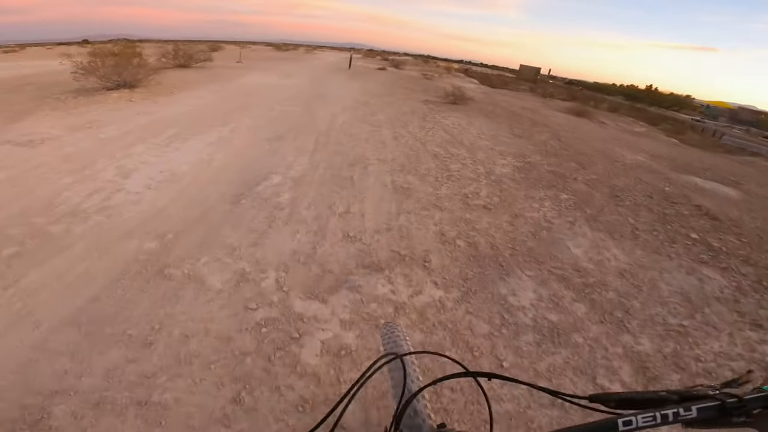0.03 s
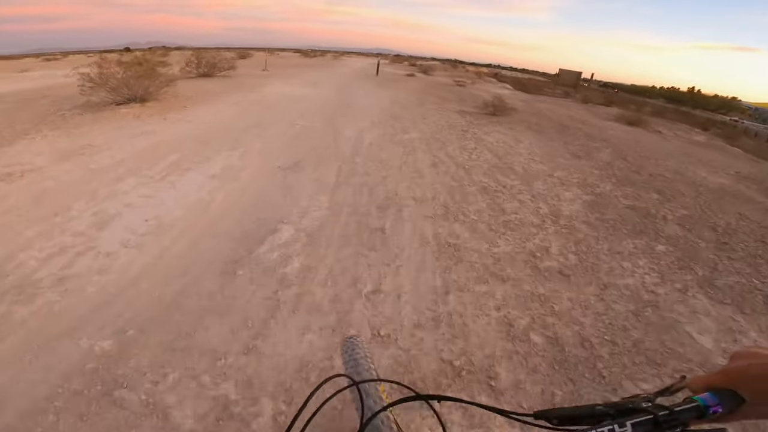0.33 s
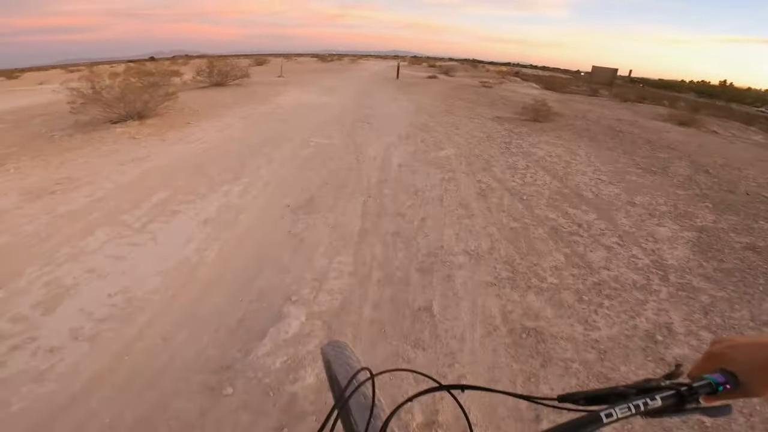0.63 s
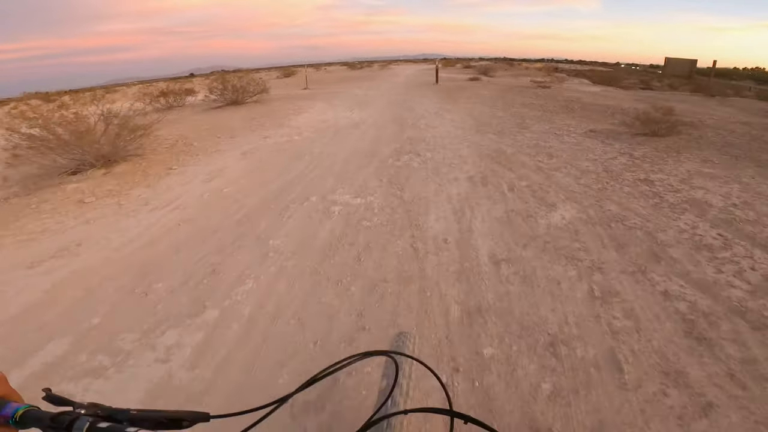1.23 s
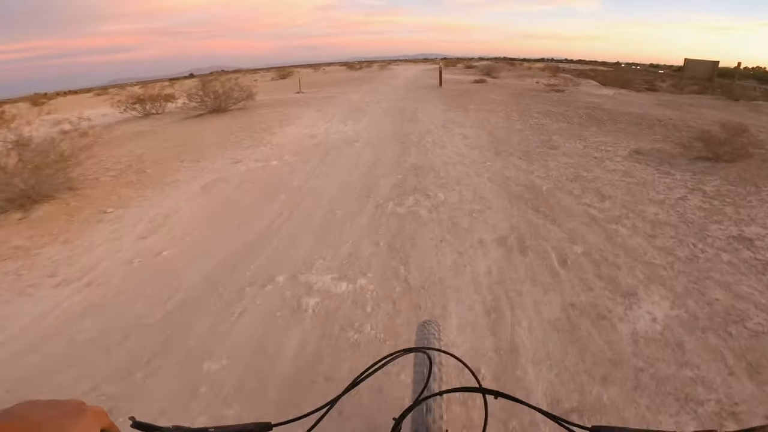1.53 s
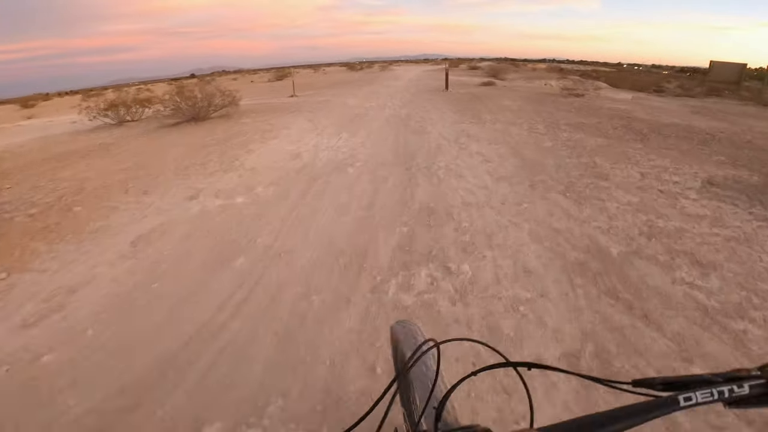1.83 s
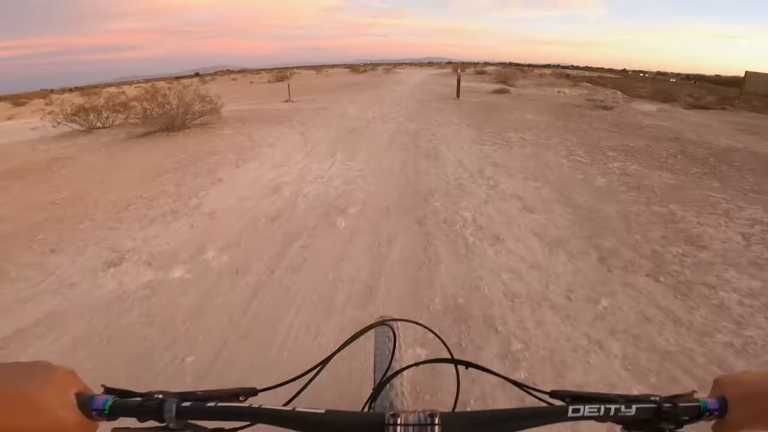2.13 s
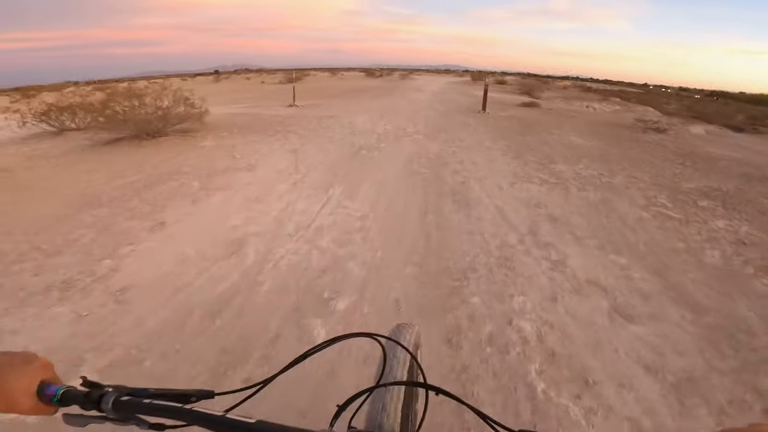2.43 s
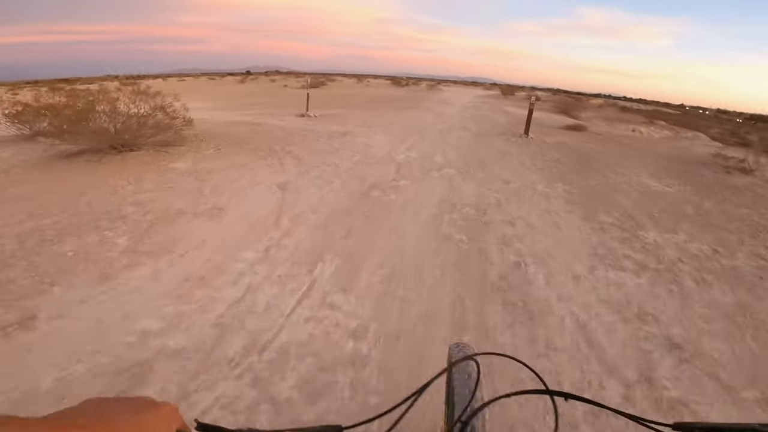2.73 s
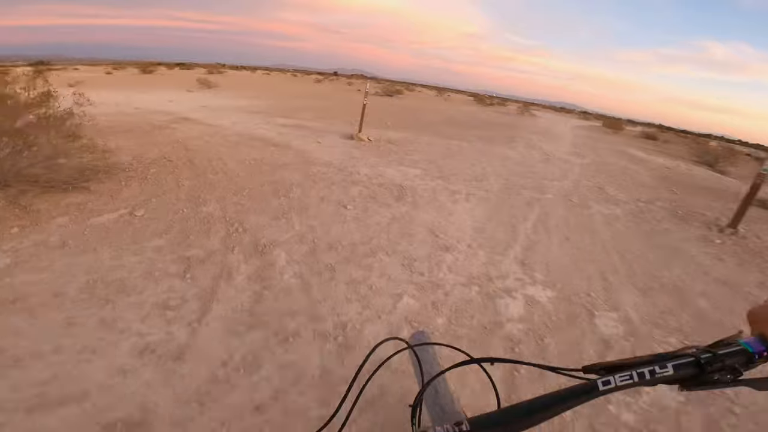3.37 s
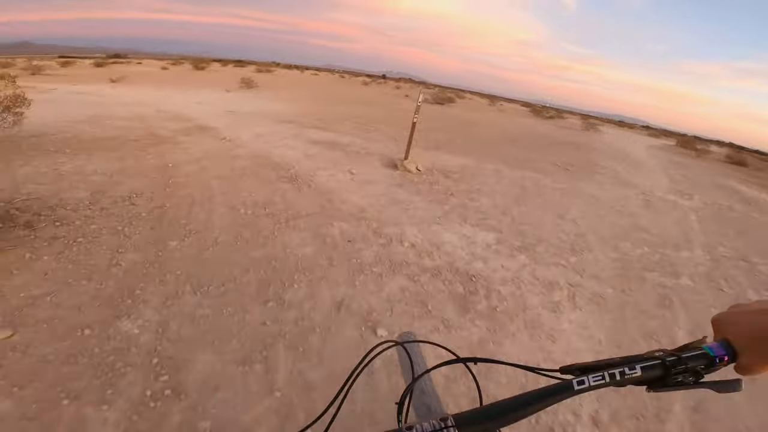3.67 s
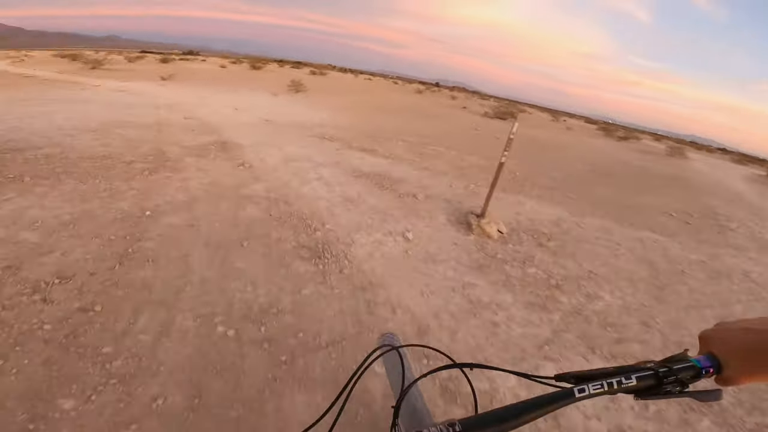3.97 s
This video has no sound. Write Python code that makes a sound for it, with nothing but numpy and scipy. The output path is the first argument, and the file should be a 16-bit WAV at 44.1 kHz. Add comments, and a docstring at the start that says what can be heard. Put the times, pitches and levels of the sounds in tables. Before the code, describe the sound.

Bicycle chain and parts clack over bumps, with crunching tyres and rumbling wind.

```python
"""A mountain bike rolls fast down a bumpy dirt trail, heard from a camera on the rider's chest.
From the start, wind buffets the microphone and the tyres crunch grit. Soon stones knock, loose metal
ticks, the wheels thump and the chain slaps the frame. Just after 1 s the front end clacks twice, then
a last big bump leaves a wheel humming. Stones keep knocking and the wind grows louder. From 3.5 s the
rider coasts and the freehub (the ratchet in the back wheel) buzzes."""
import sys
import numpy as np
from scipy import signal
from scipy.fft import rfft, irfft
from scipy.io import wavfile
from scipy.ndimage import uniform_filter1d

SR = 44100
rng = np.random.default_rng(int(sys.argv[2]) if len(sys.argv) > 2 else 0)


def unload_audio(sound):
    """Save the sound as a 16-bit wav file, at the path given as the first command line argument."""
    columns = np.transpose(np.atleast_2d(sound))
    # keep every value between -1 and 1, then stretch to whole-number steps
    steps = np.round(np.clip(columns, -1, 1) * 32767)
    wavfile.write(sys.argv[1], SR, steps.astype(np.int16))


N = 176400
T = np.arange(N) / SR
HIT_T = T[:16384]  # the clock of one short hit [s]

# A colour says how strong noise is at each frequency. A mode is one tone of a ringing part.
# A fade time (t60) is how long a sound takes to drop by 60 dB.
# how alike left and right are, for most sounds and for ticks: (frequency [Hz], likeness [-1 to 1])
LIKENESS = [(100, 1), (600, 0.95), (1400, 0.98), (3100, 0.78), (7000, 0.35), (15000, 0.12)]
TICK_LIKENESS = [(500, 0.82), (1650, 0.85), (5000, 0.22), (9000, -0.25), (15000, -0.39)]
# how far left runs ahead of right: (frequency [Hz], phase [radians])
LEFT_LEAD = [(100, 0.3), (600, -0.15), (1800, -1.09), (3700, -0.25), (5600, 0.057), (8000, 1), (15000, .2)]

# the wind's low rumble and higher roar: (time [s], relative level [dB])
RUMBLE_LEVELS = [(0.03, -32.5), (0.17, -31), (0.9, -35.5), (1.16, -29), (1.27, -33.5), (1.51, -25),
                 (1.57, -31.5), (1.96, -25), (1.99, -33), (2.1, -28), (2.14, -39), (2.19, -28),
                 (2.58, -30.5), (2.7, -22.5), (2.84, -28), (2.95, -37.5), (3.1, -37), (3.27, -27.5),
                 (3.66, -25), (3.96, -25)]
ROAR_LEVELS = [(0.0, -42), (0.6, -40), (0.87, -43.5), (1.22, -41), (2.27, -40.5), (2.5, -36.5), (2.76, -34),
               (2.95, -41.5), (3.1, -37.5), (3.21, -35), (3.41, -30), (3.51, -25.5), (3.68, -27.5),
               (3.8, -29), (4.0, -27)]
# crunching grit and droning tyre walls: (time [s], level [dB])
GRIT_LEVELS = [(0, -44), (.15, -41), (.29, -46), (.45, -40.5), (.53, -46), (.85, -40.5), (1.1, -44.5),
               (1.3, -40.5), (1.6, -44), (1.8, -44), (2.04, -40.5), (2.13, -45.5), (2.23, -45),
               (2.33, -39.5), (2.5, -36.5), (2.65, -40.5), (2.8, -43.5), (2.96, -38.5), (3.04, -37.5),
               (3.12, -41), (3.27, -40.5), (3.35, -35.5), (3.47, -40), (4, -39)]
DRONE_LEVELS = [(0, -36.5), (.2, -40), (.5, -43.5), (.9, -39), (1.15, -47), (1.55, -43), (1.85, -45.5),
                (2.2, -47.5), (3, -53), (4, -44.5)]
# colours of the wind, the tyres and a stone's knock: (frequency [Hz], relative level [dB])
RUMBLE_COLOUR = [(3, -6), (14, -8), (25, -1.5), (40, 1), (65, -1.5), (100, -6), (150, -12.5), (250, -28.5),
                 (600, -50), (2000, -97)]
ROAR_COLOUR = [(50, -12.5), (120, 1), (180, 1), (250, 1), (330, -7), (500, -16.5), (900, -30.5),
               (3000, -42), (9000, -83)]
GRIT_COLOUR = [(100, -6), (250, -3.5), (450, -3), (700, -2.5), (1200, 1.5), (1800, 0), (2800, -3),
               (4000, -11.5), (5500, -17.5), (7200, -24.5), (9000, -31.5), (12000, -39), (15500, -71)]
DRONE_COLOUR = [(120, -18.5), (250, -12), (420, 5), (620, -1), (1000, 2), (1500, -5), (2500, -34),
                (8000, -43)]
KNOCK_COLOUR = [(150, -21), (400, 0.5), (780, -4), (900, -1), (1070, 9.5), (1250, -6), (1500, 2),
                (2400, -5.5), (3400, -20), (6000, -30), (14000, -57)]
# stones under the tyres: (time [s], level [dB], pitch [multiple])
KNOCKS = [(.246, -29, 1.13), (0.3917, -23.5, 1.02), (.399, -27.5, 1.23), (.4055, -20.5, 0.8),
          (.411, -31, 0.82), (0.4204, -24.5, 0.86), (1.1642, -35, 1.55), (1.184, -29.5, 1.4),
          (1.639, -35, 1.1), (1.894, -39, 1.6), (1.921, -33.5, 1.1), (1.9983, -32.5, 0.95),
          (2.01, -30, 1.13), (2.0762, -30.5, 1.31), (2.291, -34, 1.63), (2.319, -33, 1.54),
          (2.33, -33.5, 1.46), (2.4765, -30.5, 1.35), (2.489, -32, 1.44), (2.575, -36, 1.24),
          (3.0466, -36, 1.7), (3.1344, -35, 1), (3.268, -35.5, 0.9), (3.313, -44, 0.93), (3.405, -35, 1.2),
          (3.428, -33.5, 1.45), (3.567, -29.5, 1.22), (3.587, -31, 1.28), (3.679, -29.5, 1.17)]

# the freehub's strongest ringing: (time [s], level [dB])
HUB_RING_LEVELS = [(3.5, -77), (3.54, -40), (3.6, -43), (3.68, -54), (3.75, -66), (3.82, -35.5),
                   (3.88, -64), (3.94, -41.5), (4, -51)]
# colours of its buzz and of that ringing: (frequency [Hz], relative level [dB])
HUB_BUZZ_COLOUR = [(600, -33), (1000, 2), (1250, 2.5), (1550, -8), (2100, 6.5), (2250, 6), (2420, 4),
                   (2700, 0.5), (3100, -11), (3380, -5), (3900, -8), (5100, -11), (5480, -8), (5900, -8),
                   (6500, -8.5), (7000, -6), (8000, -10.5), (9000, -14), (9850, -13.5), (11000, -17.5),
                   (12200, -19), (15500, -34)]
HUB_RING_COLOUR = [(1500, -38), (2200, -19), (2420, 3), (2550, -10), (2700, -3), (2950, -24), (3380, -10),
                   (3750, -22), (5200, -24), (5480, -16), (5800, -31), (6500, -20), (7200, -40)]
# tones of the parts that ring: (frequency [Hz], relative level [dB], fade time [s])
HUB_MODES = [(1250, -1, 0.027), (2440, 4, .028), (2600, 0, .03), (3360, 1.5, .04), (4200, -9, .06),
             (4880, -7, 0.055), (5400, -2.5, 0.04), (6540, -6, .03), (8500, -17, .04), (9800, -11, .04)]
WHEEL_MODES = [(597, -4, 0.41), (630, -1, 0.55), (695, 0, 0.54), (770, -1, 0.39)]
FRONT_END_MODES = [(792, 9, 0.11), (1312, -9.5, .11), (1730, 7, 0.033), (1740, 2, .035),
                   (2050, -4.5, 0.076), (2130, -13, 0.12), (2640, -1.5, 0.04), (3346, -6.5, 0.1),
                   (4400, -4, 0.05), (5000, -5, 0.074), (5120, -8, .08), (7200, -11, .06)]
FRAME_MODES = [(225, -4.5, 0.1), (257, -13, 0.064), (368, -5, 0.037), (419, -2.5, .06), (561, -5.5, 0.12),
               (605, -15, 0.26), (647, -15.5, 0.67), (740, -9, 0.16), (930, -16, 0.081)]
LINK_MODES = [(2110, 7, 0.14), (3310, 2.5, 0.12), (3960, -3, .11), (5000, -2, 0.085), (5400, -12, 0.11),
              (7340, -8, .1), (11100, -20, 0.12)]

# wheel thumps: (time [s], level [dB], pitch [Hz])
THUMPS = [(.317, -21.5, 243), (0.577, -22, 238), (.704, -36, 384), (.727, -14.5, 229.4), (0.7884, -19, 296),
          (.943, -18.5, 384), (.974, -18.5, 392), (.983, -14, 196), (1.4841, -14, 106)]
# loose metal ticks: (time [s], level [dB], brightness [dB per octave])
TICKS = [(0.2532, -18.5, 3), (0.3492, -23.5, 0.5), (0.427, -22.5, -1.5), (0.459, -35, -3.5),
         (0.4838, -25, 0.5), (0.6234, -27.5, -4), (1.245, -47, 4), (1.605, -42, 1), (2.772, -50, 2),
         (3.149, -42, -0.5), (3.489, -44, 1.5)]
# front end clacks: (time [s], ring level [dB], crack level [dB], contact pitch [Hz], hold [s])
CLACKS = [(1.1945, -18, -24.5, 1660, .004), (1.368, -19.5, -20.5, 2230, 0.0071)]
# clanks of single chain links: (time [s], level [dB], pitch [Hz])
CLANKS = [(.712, -39.5, 6100), (.7855, -41.5, 6000), (.941, -30, 5100), (.943, -30.5, 2070),
          (.973, -37, 4270), (1.026, -43, 5270), (1.442, -30.5, 3270), (1.446, -36.5, 5300)]
# colour of a clank: (frequency [multiple of its pitch], relative level [dB])
CLANK_COLOUR = [(.25, -35), (.8, -26), (.96, -4.5), (1, -3.5), (1.04, -10), (1.2, -21), (3, -40)]
# chain slaps: (time [s], hold [s], thud level [dB], clatter level [dB], jingle level [dB])
SLAPS = [(0.314, 0.0029, -31.5, -39, -45.5), (0.5708, 0.011, -34.5, -41.5, -55),
         (0.701, .012, -25.5, -29, -38), (0.723, 0.024, -30.5, -32.5, -46.5),
         (0.7844, 0.0037, -24.5, -27, -41.5), (.81, 0.0072, -48, -50, -57),
         (0.8546, 0.016, -29, -29.5, -48), (0.939, 0.0043, -27.5, -33, -34.5),
         (0.97, 0.017, -33.5, -31, -46), (1.025, 0.0057, -37, -37, -39.5),
         (1.439, 0.014, -27.5, -32.5, -42.5), (1.467, .008, -30, -27.5, -41.5),
         (1.485, 0.016, -36.5, -47, -54), (1.563, 0.023, -35, -45, -57)]
# colours of a tick, a clack's crack and a slap's three parts: (frequency [Hz], relative level [dB])
TICK_COLOUR = [(300, -13), (800, 5), (1050, 7), (1250, -7.5), (1650, 13), (2350, -4.5), (2900, 1.5),
               (3450, 5.5), (4300, -3), (5100, -2.5), (5900, 2.5), (6400, -0.5), (7300, -1), (9000, -13.5),
               (11800, -13), (15500, -30)]
CRACK_COLOUR = [(300, -4), (800, -13), (1000, -9), (1250, 3.5), (1650, 1.5), (2200, -2), (2800, -4.5),
                (3800, -10), (5300, -7), (6200, -19.5), (7200, -22), (9000, -27.5), (15000, -47)]
THUD_COLOUR = [(60, -25), (160, -13.5), (235, 3.5), (310, -3), (390, -3), (490, -10), (640, -7), (900, -19),
               (2000, -68)]
CLATTER_COLOUR = [(300, -8.5), (750, 1.5), (1100, 0), (1600, 3.5), (2200, 0), (2900, -3), (3900, -16.5),
                  (7000, -35), (15000, -56)]
JINGLE_COLOUR = [(1500, -32), (3200, 0), (4000, -1), (5000, 2.5), (6200, -6), (7200, -3), (8800, -11),
                 (11500, -13.5), (15500, -38)]


def amp(db):
    """Turns decibels into a number to multiply by."""
    return 10 ** (np.asarray(db) / 20)


def normalise(x):
    """Scales a signal to an average power of 1."""
    return x / np.sqrt(np.mean(x ** 2) + 1e-20)


def look_up(table, hz):
    """Reads a table between its rows, giving each octave equal room."""
    row_hz, value = np.transpose(table)
    return np.interp(np.log(hz + 1), np.log(row_hz), value)


def level(table):
    """Gain over time from rows of (time [s], level [dB])."""
    return amp(np.interp(T, *np.transpose(table)))


def pan(left_db):
    """Makes left louder than right; a negative value favours the right."""
    return amp([[left_db / 2], [-left_db / 2]])


def add(mix, start_s, sound):
    """Adds a sound to the mix at a given time."""
    part = mix[:, round(start_s * SR):][:, :sound.shape[1]]
    part += sound[:, :part.shape[1]]


def noise(n=N):
    """Two unrelated channels of plain hiss."""
    return rng.standard_normal((2, n))


def wander(hz):
    """A slow random wobble, up to about hz."""
    freqs = np.fft.rfftfreq(N, 1 / SR)
    return normalise(irfft(rfft(rng.standard_normal(N)) / (1 + (freqs / hz) ** 2), N))


def coloured(pair, colour, likeness=None):
    """Gives two unrelated noises a colour and blends them into left and right."""
    n = pair.shape[1]
    hz = np.fft.rfftfreq(n, 1 / SR)
    cepstrum = irfft(np.log(amp(look_up(colour, hz))), n)
    # keeping the first half makes the filter ring after a sound, never before
    response = np.exp(rfft(2 * cepstrum * (np.arange(n) < n // 2)))
    shared, separate = rfft(pair) * response
    if likeness is None:
        likeness = look_up(LIKENESS, hz)
    left = shared * np.exp(1j * look_up(LEFT_LEAD, hz))
    right = likeness * shared + np.sqrt(1 - likeness ** 2) * separate
    return normalise(irfft(np.array([left, right]), n))


def hit(colour, hold_s, t60, tail_db=-60, tail_t60=0.1, rise_s=0.00028, likeness=None):
    """A burst of noise: it rises fast, holds while parts chatter, then fades with a weak tail."""
    fading_s = np.maximum(HIT_T - hold_s, 0)
    fade = np.hypot(amp(-60 * fading_s / t60), amp(tail_db - 60 * fading_s / tail_t60))
    return np.minimum(HIT_T / rise_s, 1) * fade * coloured(noise(len(HIT_T)), colour, likeness)


def ring(modes):
    """A struck part rings with several tones, each fading at its own speed."""
    tones = np.zeros((2, len(HIT_T)))
    for hz, db, t60 in modes:
        phase = 2 * np.pi * (hz * HIT_T + rng.random())
        tones += amp(db - 60 * HIT_T / t60) * np.sin([phase + look_up(LEFT_LEAD, hz), phase])
    return np.minimum(HIT_T / 0.00037, 1) * tones


def crackle(per_s, spread_db, decay_s, share):
    """A gain that jumps at each tiny random contact; share is their part of the power."""
    sizes = amp(spread_db * np.minimum(rng.exponential(1, N), 3))
    touches = rng.random(N) < per_s / SR
    contacts = normalise(signal.oaconvolve(sizes * touches, np.exp(-HIT_T / decay_s))[:N])
    return np.sqrt(share * contacts ** 2 + 1 - share)


def wind():
    """Gusts buffet the microphone: a lumpy rumble, more on the right, and a higher roar."""
    rumble = coloured(noise(), RUMBLE_COLOUR, likeness=0.14) * amp(0.65 * wander(hz=9.6))
    roar = coloured(noise(), ROAR_COLOUR, likeness=0.54) * amp(1.5 * wander(hz=23))
    return (amp(5) * level(RUMBLE_LEVELS) * normalise(rumble) * pan(left_db=-3.5)
            + amp(1.5) * level(ROAR_LEVELS) * normalise(roar))


def tyres():
    """The tread crushes grit in many tiny cracks, over the hollow drone of the tyre walls."""
    cracks = noise() * crackle(per_s=700, spread_db=2.5, decay_s=0.0011, share=0.46)
    spectrum = signal.stft(coloured(cracks, GRIT_COLOUR), nperseg=512)[2]
    # random patches of pitch and time get a little louder or softer
    patches = uniform_filter1d(rng.standard_normal(spectrum.shape[1:]), size=7, axis=0)
    patches_db = 1.5 * normalise(uniform_filter1d(patches, size=6, axis=1))
    grit = normalise(signal.istft(spectrum * amp(patches_db), nperseg=512)[1][:, :N])
    return level(GRIT_LEVELS) * grit + level(DRONE_LEVELS) * coloured(noise(), DRONE_COLOUR)


def stones():
    """Stones knock dully under the tyres; smaller ones sound higher."""
    out = np.zeros((2, N))
    for start_s, db, pitch in KNOCKS:
        colour = np.array(KNOCK_COLOUR) * [pitch, 1]
        add(out, start_s, amp(db) * hit(colour, hold_s=0.0021, t60=0.043))
    return out


def freehub(coast_s=3.505, rise_s=0.083, click_hz=439, slowing_hz_per_s=15, hiss=0.52):
    """Small catches click over the ratchet so fast that they buzz and ring the hub's shell."""
    coasting_s = T - coast_s
    uneven_hz = (click_hz - slowing_hz_per_s * coasting_s) * (1 + 0.1 * wander(hz=59.7))
    teeth_passed = np.cumsum(uneven_hz) / SR
    pulses = normalise(np.exp(-3 * (teeth_passed % 1)))
    clicks = noise() * (hiss + (1 - hiss) * pulses)
    shell = normalise(signal.oaconvolve(clicks, ring(HUB_MODES), axes=1)[:, :N])
    buzz = amp(-40.5) * coloured(clicks, HUB_BUZZ_COLOUR) + amp(-47) * shell
    ringing = level(HUB_RING_LEVELS) * coloured(clicks, HUB_RING_COLOUR)
    return np.clip(coasting_s / rise_s, 0, 1) * buzz + ringing


def wheel_thumps(rise_s=0.00094, t60=0.063):
    """Hard bumps send a short low tone through the frame; the last leaves a wheel humming."""
    out = np.zeros((2, N))
    for start_s, db, hz in THUMPS:
        loudness = amp(db - 60 * HIT_T / t60) * np.minimum(HIT_T / rise_s, 1)
        add(out, start_s, (loudness * np.sin(2 * np.pi * hz * HIT_T))[None])
    add(out, start_s=1.485, sound=amp(-35.5) * ring(WHEEL_MODES))
    return out


def metal_ticks():
    """A loose metal part taps its stop, a little to the right; some taps are brighter."""
    out = np.zeros((2, N))
    likeness = look_up(TICK_LIKENESS, np.fft.rfftfreq(len(HIT_T), 1 / SR))
    for start_s, db, brightness in TICKS:
        colour = [(hz, band_db + brightness * np.log2(hz)) for hz, band_db in TICK_COLOUR]
        tick = hit(colour, hold_s=0.002, t60=0.013, tail_db=-18.5, tail_t60=0.13, likeness=likeness)
        add(out, start_s, amp(db) * tick)
    return out * pan(left_db=-2.5)


def front_end_clacks(loss_db_per_octave=13.5):
    """A hard contact cracks and rings the front end, most in the tones near its own pitch."""
    out = np.zeros((2, N))
    for start_s, ring_db, crack_db, contact_hz, hold_s in CLACKS:
        modes = [(hz, db - loss_db_per_octave * abs(np.log2(hz / contact_hz)), t60)
                 for hz, db, t60 in FRONT_END_MODES]
        crack = hit(CRACK_COLOUR, hold_s, t60=0.027, tail_db=-10.5, tail_t60=0.19)
        add(out, start_s, amp(crack_db) * crack + amp(ring_db) * ring(modes))
    return out * pan(left_db=2)


def link_clanks():
    """Single chain links land on bare metal, each ringing briefly at its own pitch."""
    out = np.zeros((2, N))
    for start_s, db, hz in CLANKS:
        colour = np.array(CLANK_COLOUR) * [hz, 1]
        add(out, start_s, amp(db) * hit(colour, hold_s=0.0016, t60=0.073))
    return out


def chain_slaps():
    """The chain whips the frame with a thud, a clatter and a bright jingle, and both ring on."""
    rattle, body = np.zeros((2, 2, N))
    for start_s, hold_s, thud_db, clatter_db, jingle_db in SLAPS:
        clatter = hit(CLATTER_COLOUR, hold_s, t60=0.048, tail_db=-8.5, tail_t60=0.24, rise_s=0.00053)
        jingle = hit(JINGLE_COLOUR, hold_s, t60=0.062, tail_db=-8, tail_t60=0.36, rise_s=0.0012)
        add(rattle, start_s, amp(clatter_db) * clatter + amp(jingle_db) * jingle)
        add(body, start_s, amp(thud_db) * hit(THUD_COLOUR, hold_s, t60=0.17, rise_s=0.0029))
        frame_ring = amp(thud_db - 2.5) * ring(FRAME_MODES)
        link_ring = amp(jingle_db - 10.5) * ring(LINK_MODES)
        add(body, start_s + hold_s / 2, frame_ring + link_ring)
    link_by_link = crackle(per_s=200, spread_db=1.5, decay_s=0.0036, share=0.3)
    return (rattle * link_by_link + body) * pan(left_db=1)


def scene():
    """The bike and the wind, in the open with no echo."""
    bumps = chain_slaps() + link_clanks() + wheel_thumps() + metal_ticks() + front_end_clacks()
    return bumps + stones() + tyres() + wind() + freehub()


def record(dry):
    """The camera cuts the highest treble; both ends fade for 4 ms."""
    fade = np.minimum(np.minimum(T, T[::-1]) / 0.004, 1)
    treble_cut = signal.firwin(511, cutoff=15500, window=("kaiser", 9), fs=SR)
    return signal.oaconvolve(dry * fade, treble_cut[None], "same")


dry = scene()
out = record(dry)
unload_audio(out)
```